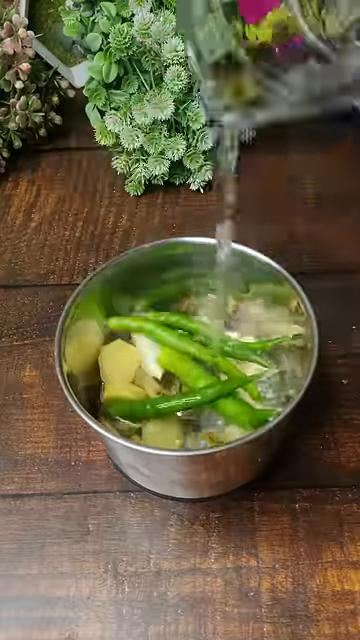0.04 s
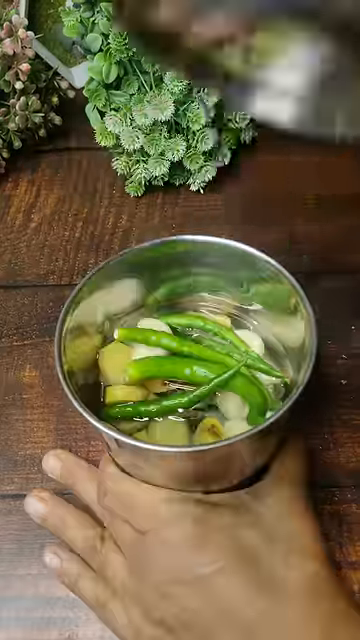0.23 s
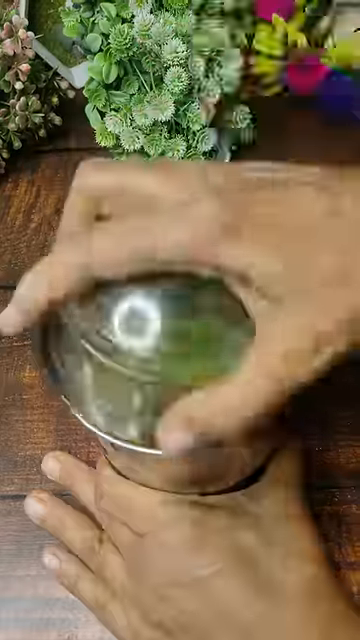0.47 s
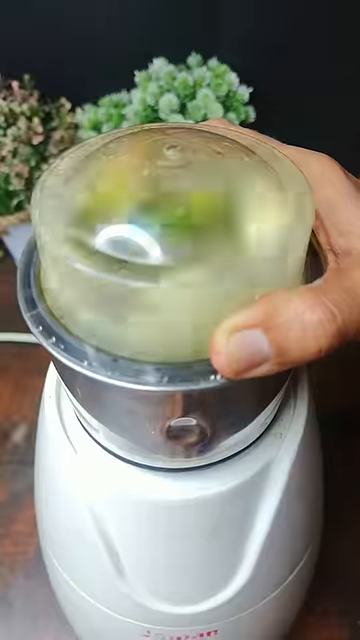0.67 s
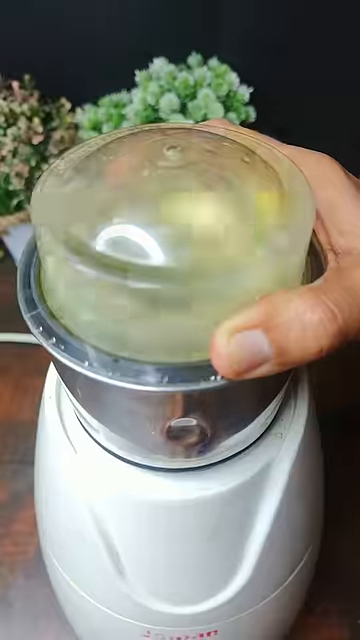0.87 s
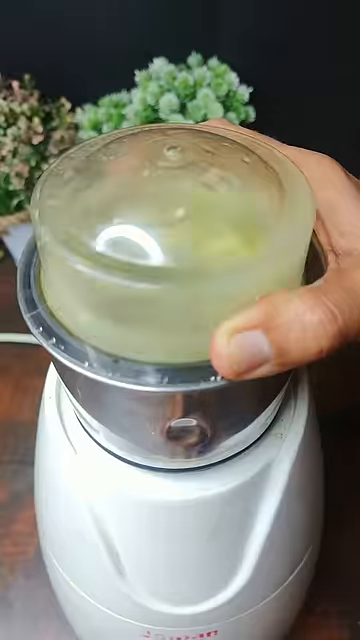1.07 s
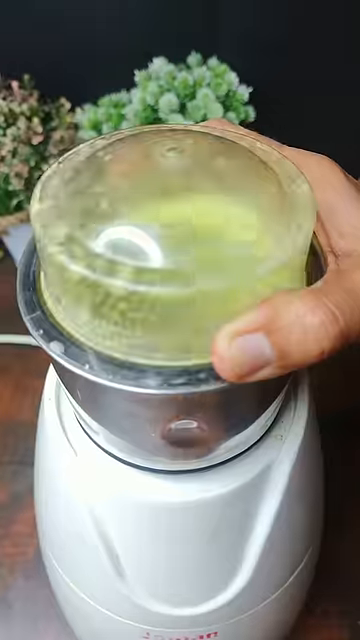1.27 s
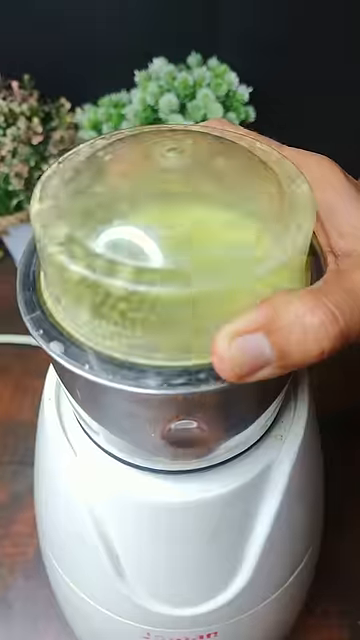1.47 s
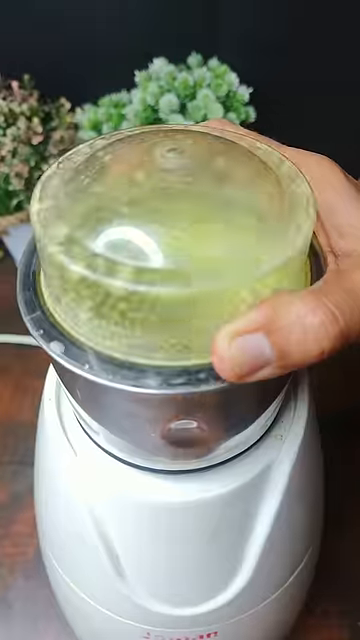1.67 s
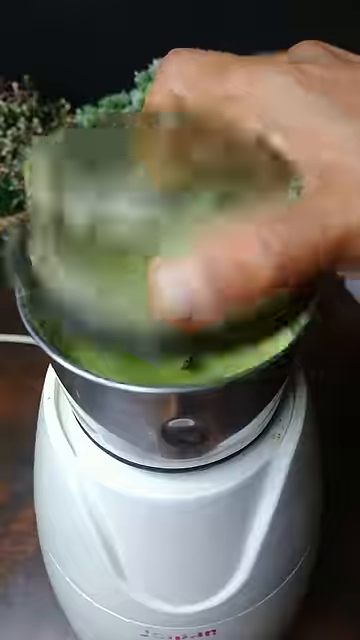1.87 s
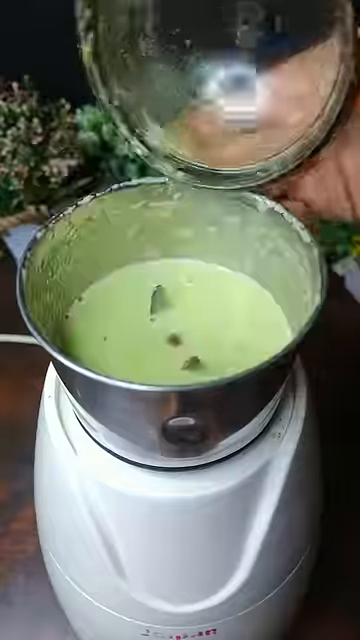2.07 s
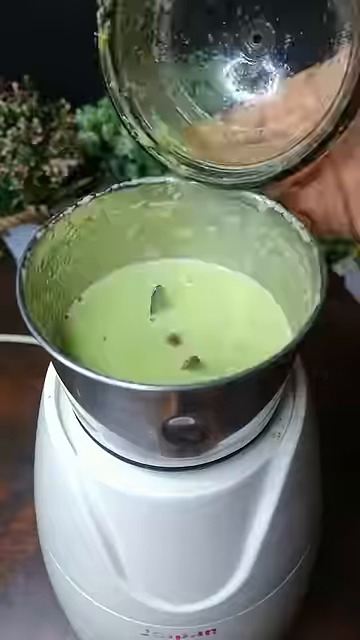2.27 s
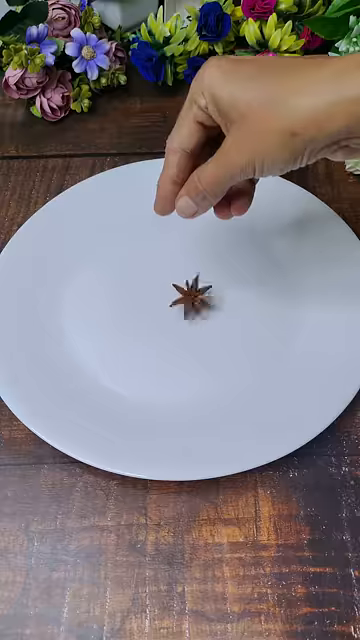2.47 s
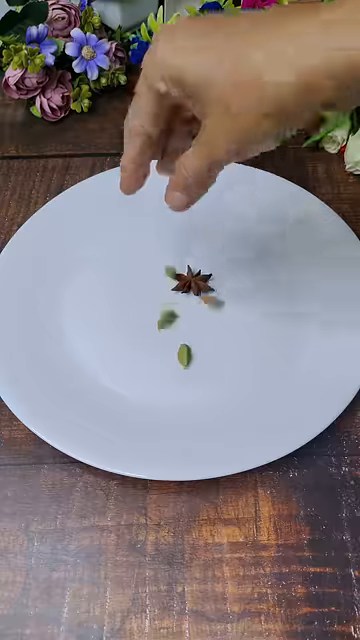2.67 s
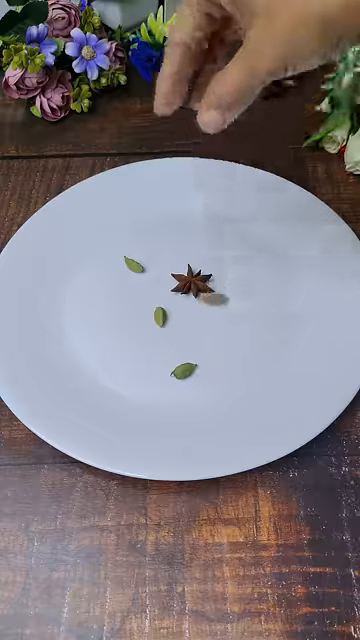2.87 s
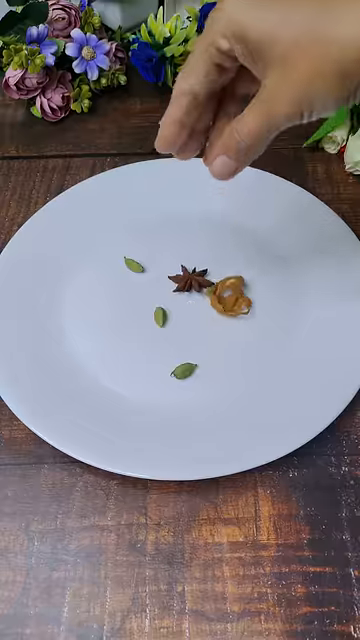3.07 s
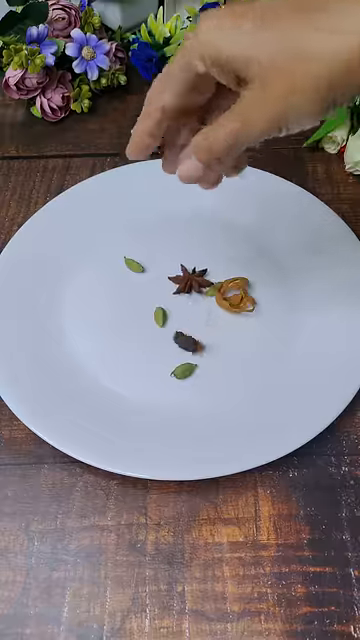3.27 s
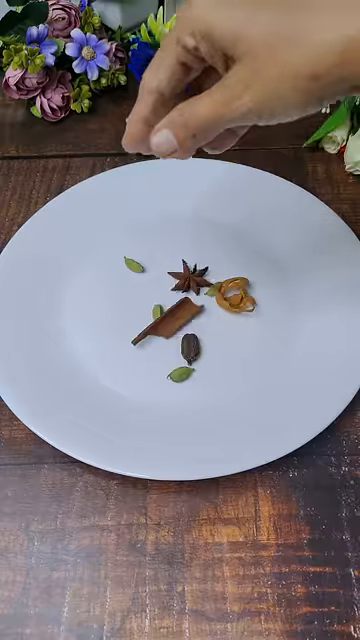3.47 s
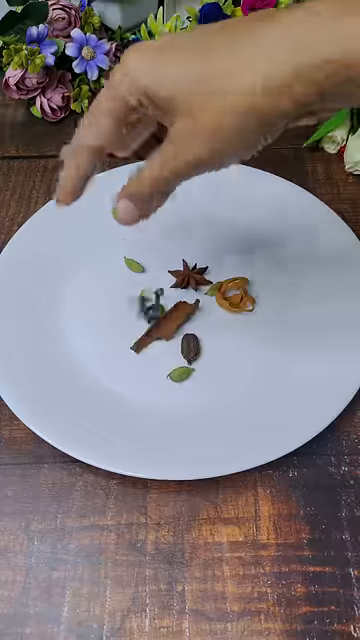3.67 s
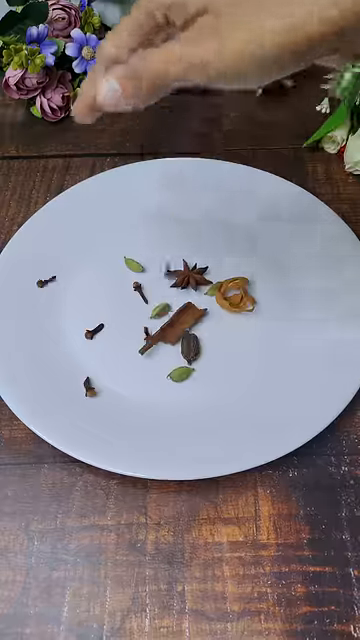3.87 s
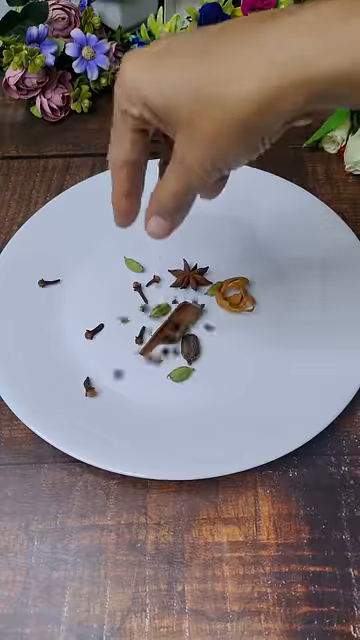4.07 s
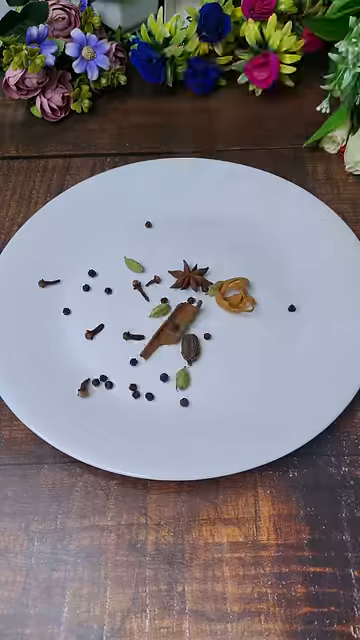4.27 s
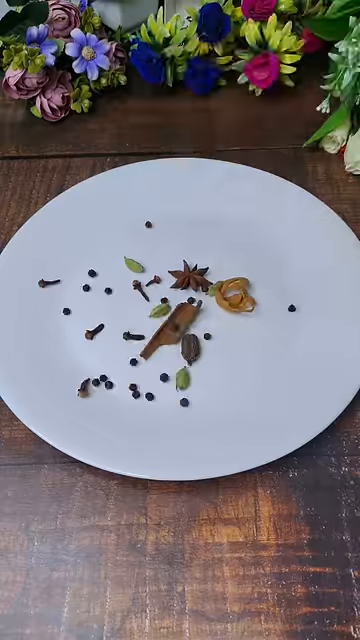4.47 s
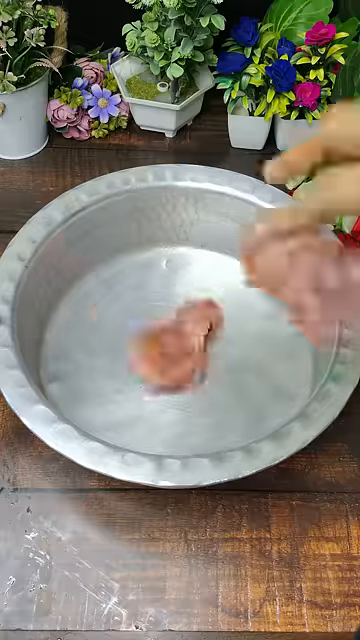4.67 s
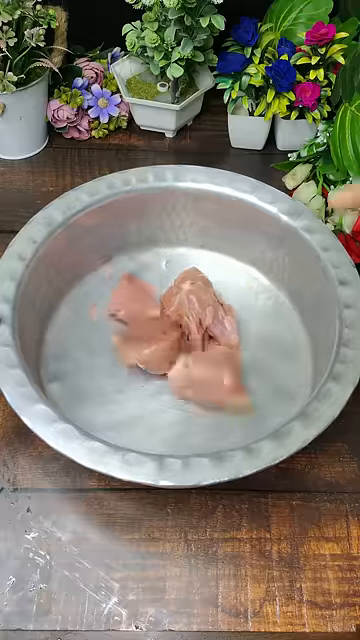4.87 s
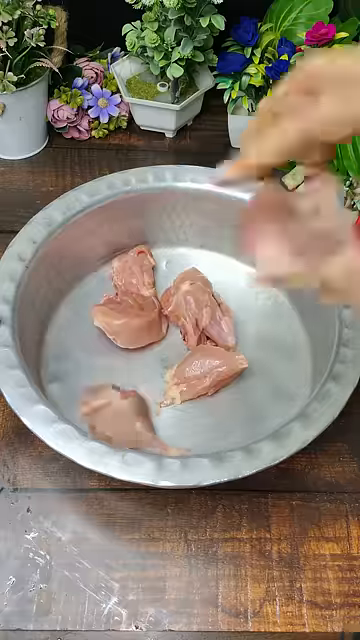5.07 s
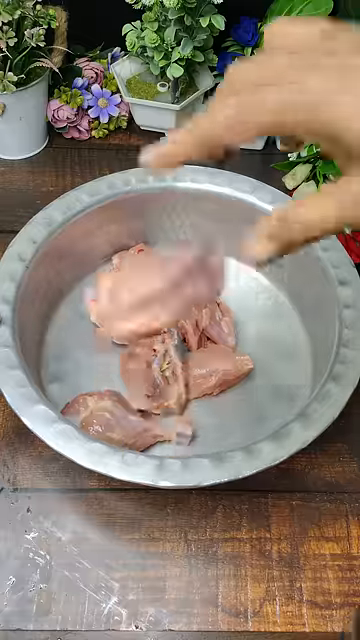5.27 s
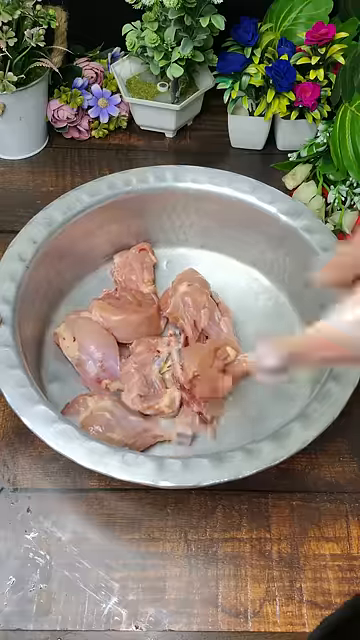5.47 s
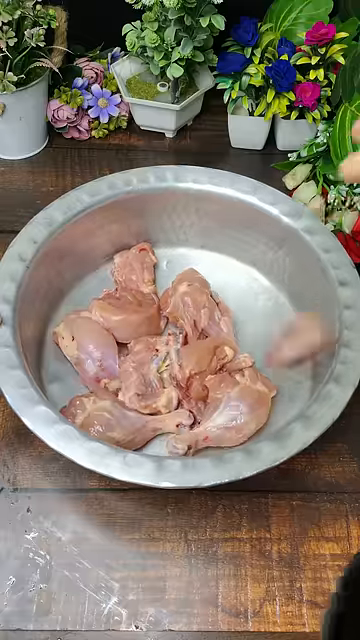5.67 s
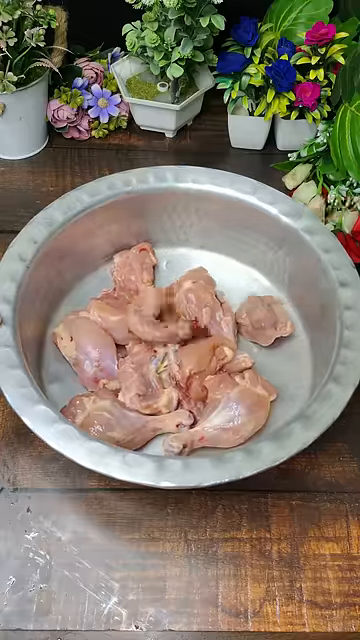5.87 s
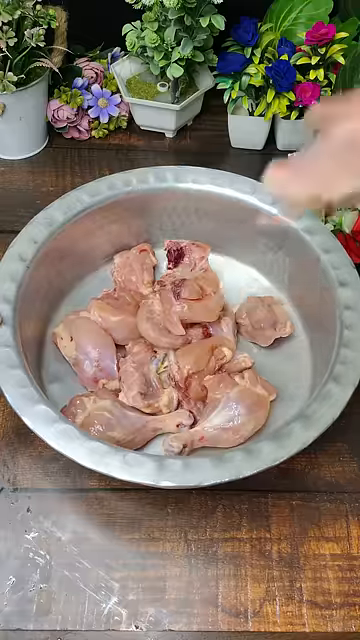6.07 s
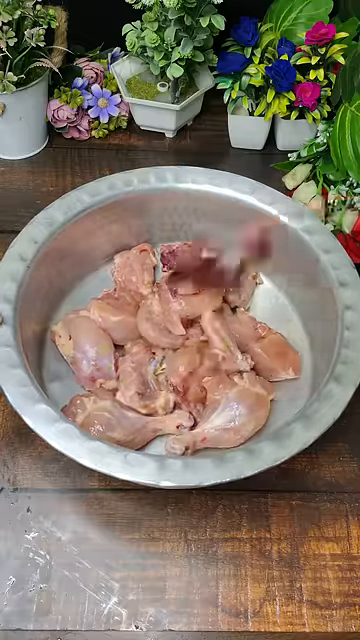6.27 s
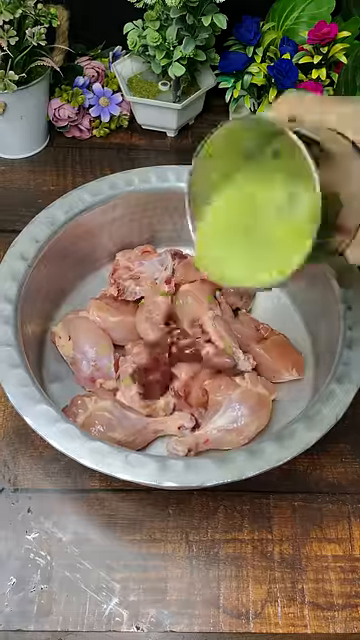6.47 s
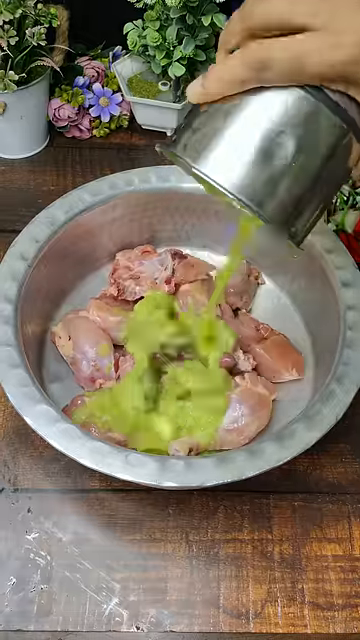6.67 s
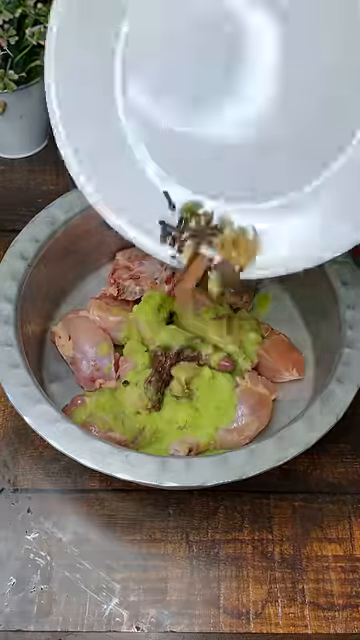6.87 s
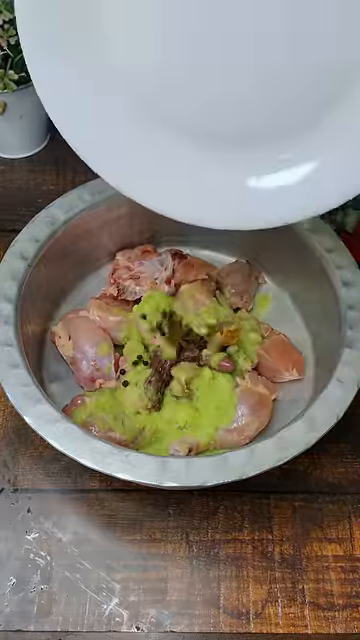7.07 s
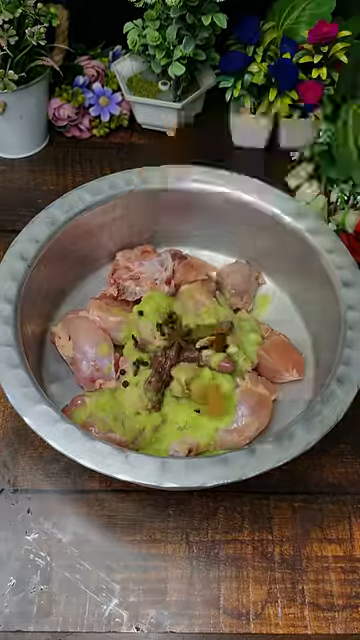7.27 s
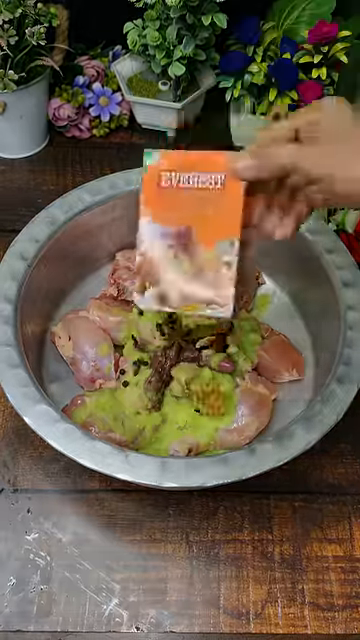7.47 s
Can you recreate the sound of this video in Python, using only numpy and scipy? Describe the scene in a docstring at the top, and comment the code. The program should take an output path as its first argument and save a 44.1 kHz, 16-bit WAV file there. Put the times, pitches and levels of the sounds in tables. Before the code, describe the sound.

A brisk cooking sequence close to the microphone in a small room, each sound clipped off with near silence between. Water splashes into a steel jar; its lid thumps on; a grinder hums, roars and slows. After wet lid noises come bright ticks of spices on china, heavier for bark, finer for peppercorns. Fleshy slaps hit a broad metal pot, then paste squelches and crackles, and seeds scrape and rain softly.

```python
"""A briskly cut kitchen sequence: water (chirping bubbles, hissing splash) runs into a steel jar, its lid goes on,
a grinder (tones and grainy noise) whirls and runs down, the lid comes off with wet smacks. Whole spices strike
the modes of a china plate, meat slaps and thuds into a wide metal pot on a wooden table, paste is poured over it
as wet bursts and crackle, and the spices slide off the plate by friction. Each passage is cut off while it
still rings, over a wash of noise; some landings of meat are heard again, once or twice."""
import sys
import numpy as np
from scipy import signal
from scipy.io import wavfile

SR = 44100
rng = np.random.default_rng(int(sys.argv[2]) if len(sys.argv) > 2 else 0)


def dump_mix(stems):
    """Bounce the given channels to the path in sys.argv[1] as a 16-bit WAV at rate SR."""
    frames = np.atleast_2d(stems).T  # one column per channel
    limited = np.clip(frames, -1, 1)  # hard clip at full scale
    pcm = np.round(limited * 32767).astype(np.int16)
    wavfile.write(sys.argv[1], SR, pcm)


N = 332073

# The passages of the sequence. Each row: opening in seconds, closing in seconds,
# level in dB of the wash of noise under the passage.
PASSAGES = [(0.0, 0.136, -55), (0.399, 0.547, -50.5), (0.576, 1.205, -56), (1.191, 1.877, -55.5),
            (1.882, 2.065, -48), (2.076, 2.459, -49.5), (2.516, 2.659, -56.5), (2.693, 2.914, -52.5),
            (2.965, 3.162, -49.5), (3.249, 3.396, -58.5), (3.458, 3.68, -53.5), (3.781, 4.021, -54),
            (4.101, 4.309, -61), (4.6, 4.677, -35.5), (4.721, 4.795, -38.5), (4.866, 4.936, -38),
            (4.986, 5.087, -43), (5.154, 5.226, -33.5), (5.531, 5.611, -41), (6.068, 6.171, -47.5),
            (6.217, 6.37, -57), (6.478, 6.85, -56), (6.843, 7.303, -67.5)]
# Modes of the steel jar. Each row: frequency in Hz, relative level in dB, decay time t60 in seconds.
JAR_MODES = [(132.8, -6, 0.18), (564, -3.5, 0.057), (279, 0, 0.097), (335, 7, 0.023), (747, 6, 0.06),
             (920, -0.5, 0.034), (1350, -6.5, 0.05)]
# Low modes of pot and table top. Each row: frequency in Hz, relative level in dB, decay time t60 in seconds.
THUD_MODES = [(109.4, -5, 0.39), (135.2, 1.5, 0.16), (260, -14.5, 0.15)]


def from_db(db):
    """Amplitude ratio by the definition of the decibel."""
    return 10 ** (np.asarray(db) / 20)


def rms_one(x):
    """Normalization to unit root-mean-square amplitude."""
    return x / np.sqrt(np.mean(x ** 2) + 1e-20)


def span(*tables):
    """Envelopes linear in dB: the sample range of some curve tables and their summed gains over it."""
    first, last = round(tables[0][0][0] * SR), round(tables[-1][-1][0] * SR)
    t = np.arange(first, last) / SR
    gains = 0
    for rows in tables:
        s, *columns = np.transpose(rows)
        # outside its own times a table is silent
        gains = gains + from_db([np.interp(t, s, c, left=-200, right=-200) for c in columns])
    return slice(first, last), gains


def at_hz(points, hz):
    """Interpolation along a logarithmic frequency axis."""
    points = np.array(points)
    return np.interp(np.log(hz), np.log(points[:, 0]), points[:, 1])


def band(x, low_hz, high_hz):
    """Band-pass filtering with Butterworth skirts."""
    sos = signal.butter(2, [low_hz, min(high_hz, .46 * SR)], "band", fs=SR, output="sos")
    return signal.sosfilt(sos, x)


def grains(count, per_s, spread_db):
    """Shot noise: random impulses of uneven size and sign, normalized to rms 1."""
    sizes = from_db(spread_db * np.minimum(rng.exponential(1, count), 4)) * rng.choice([-1, 1], count)
    return rms_one(sizes * (rng.random(count) < per_s / SR))


def coloured(count, spectrum, low_hz, high_hz, grain=0., per_s=540.0):
    """Band-by-band stereo noise of rms 1; shared clicks, a share grain of its power, line the bands up."""
    # Correlation of the two ears. Each row: frequency in Hz, left-right likeness from 0 to 1.
    likeness = [(60, 1), (240, 0.85), (950, 0.11), (3770, 0.05)]
    edges_hz = 22 * 2 ** np.arange(0, 9.9, .4)
    white = rng.standard_normal((2, 2, count))
    clicks = grains(count, per_s, 3.0)
    share = np.clip(grain, 0, 1)
    out = 0
    for k, (low, high) in enumerate(zip(edges_hz, edges_hz[1:])):
        hz = np.sqrt(low * high)
        if low_hz < hz < high_hz:
            click_pair = clicks * [[1], [1 - 2 * (k % 2)]]
            mid, side = band(np.sqrt(1 - share) * white[k % 2] + np.sqrt(share) * click_pair, low, high)
            alike = np.clip(at_hz(likeness, hz), 0, 1)
            stereo = np.sqrt(1 + alike) * mid + np.sqrt(1 - alike) * side * [[1], [-1]]
            out = out + from_db(at_hz(spectrum, hz)) * stereo
    return rms_one(out)


def by_passage(x, work):
    """Truncated response: every passage is worked on alone, so nothing rings on across a cut."""
    out = np.zeros((2, N))
    for opens, closes, *_ in PASSAGES:
        part = slice(round(opens * SR), round(closes * SR))
        if np.any(x[..., part]):
            out[:, part] = work(x[..., part])
    return out


def ring(clicks, hz, t60):
    """Impulse response of a damped resonator; the angle of a complex click sets the phase."""
    pole = from_db(-60 / (t60 * SR)) * np.exp(2j * np.pi * hz / SR)
    return signal.lfilter([1], [1, -pole], clicks).imag


def resound(drive, modes):
    """Modal superposition under a dense drive."""
    return by_passage(drive, lambda part: sum(from_db(db) * ring(part, hz, t60) for hz, db, t60 in modes))


def struck(modes, s, db, pan_db, scatter_db, wide_hz):
    """Modal excitation by blows (db: blows x modes); higher modes reach the ears ever less in phase."""
    out, luck = np.zeros((2, N)), rng.standard_normal((len(s), len(modes), 2))
    for opens, closes, *_ in PASSAGES:
        here, first = (s >= opens) & (s < closes), round(opens * SR)
        for k, (hz, level_db, t60) in enumerate(modes if here.any() else []):
            clicks = np.zeros((2, round(closes * SR) - first), complex)
            phase = np.outer([1, -1], luck[here, k, 1]) * min(hz / wide_hz, 1.2)
            turn = (-1) ** k * np.exp(1j * phase)
            pan = np.outer([.5, -.5], pan_db[here])
            size = from_db(db[here, k] + level_db + scatter_db * luck[here, k, 0] + pan)
            clicks[:, (s[here] * SR).astype(int) - first] = size * turn
            out[:, first:first + clicks.shape[1]] += ring(clicks, hz, t60)
    return out


def cracks(s, db, hz, pan_db, t60, octaves, alike=.15):
    """Decaying noise bursts around a centre: a contact, or a clatter of modes too dense to tell apart."""
    rise_s = 0.000079   # time constant of the onset
    out = np.zeros((2, N))
    ends = [closes for opens, closes, *_ in PASSAGES]
    for start, level_db, centre, pan in zip(s, db, hz, pan_db):
        left_s = ends[np.searchsorted(ends, start)] - start   # until the cut
        t = np.arange(round(min(t60, left_s) * SR)) / SR
        envelope = from_db(-60 * t / t60) * (1 - np.exp(-t / rise_s))
        mid, side = rng.standard_normal((2, round(t60 * SR)))[:, :len(t)] * envelope
        low, high = centre / 2 ** octaves, centre * 2 ** octaves
        burst = band(mid + (1 - alike) * side * [[1], [-1]], low, high)
        burst = band(burst, low / 2, high * 2.3)   # steeper skirts
        size = np.sqrt(t60 * SR / np.sum(burst ** 2)) / 8   # peak near 1
        at = round(start * SR)
        out[:, at:at + len(t)] += size * burst * from_db(level_db + np.array([[.5], [-.5]]) * pan)
    return out


def blobs(s, db, hz, cycles, climb):
    """Bubble resonance: air pockets closing in liquid give short rings whose pitch climbs."""
    out, t = np.zeros((2, N)), np.arange(900) / SR
    for start, level_db, pitch, pan in zip(s, db, hz, rng.uniform(-4, 3.5, len(s))):
        age = t * pitch / cycles
        chirp = np.sin(2 * np.pi * pitch * t * (1 + climb * t)) * age * np.exp(1 - age)
        at = round(start * SR)
        out[:, at:at + 900] += chirp * from_db([[level_db + pan], [level_db - pan]])
    return out


def water():
    """Bubble resonance: dense small air pockets ring on a fine noise of splashing."""
    # Level curve of the trickle. Each row: time in seconds, level in dB.
    trickle = [(0.0, -35.5), (0.134, -37.5)]
    # The clearest bubbles. Each row: start in seconds, level over the trickle in dB, pitch in Hz.
    clear_bubbles = [(.017, -5.5, 1280), (.044, 1, 3600), (.062, 1, 2350), (.076, 0, 3040), (.084, 3, 3160),
                     (.094, 4, 2000), (.117, 4, 3360)]
    part, (gain,) = span(trickle)
    when, pitch, size = rng.random((130, 3)).T
    small = blobs(when * part.stop / SR, 16 * size + 5 * pitch, 1050 * 5.5 ** pitch, cycles=2.3, climb=3.2)
    s, db, hz = np.transpose(clear_bubbles)
    drops = blobs(s, db, hz, cycles=4.0, climb=6.2)
    drops += cracks(s, db + 10, 8800 + 0 * s, 0 * s, t60=0.014, octaves=0.21)   # each drop spits
    bubbles = 0.29 * rms_one(small[:, part]) + drops[:, part]
    splash_colour = [(500, -12.5), (3000, -3.5), (6200, -12), (9000, -9.5), (15000, -18)]   # (Hz, dB per Hz)
    splash = coloured(part.stop, splash_colour, 500, 16000, grain=0.38)
    return np.pad(gain * (bubbles + 0.46 * splash), [(0, 0), (0, N - part.stop)])


def jar():
    """Modal excitation: knocks and lumps ring wall and base; hands rumble the table, the wet lid rustles."""
    # Lid pressed on, switch thrown, lid pulled off. Each row: start in seconds, then relative levels in dB
    # of ring, thump, crack and bright rasp.
    knocks = [(0.407, -26, -20.5, -18.5, -21), (0.419, -53.5, -8.5, -15.5, -37),
              (0.428, -37.5, -11.5, -34, -44), (0.656, -48.5, -40.5, -4.5, -10.5),
              (0.677, -25, -9.5, -11, -21), (0.699, -22.5, -7.5, -24.5, -21),
              (1.938, -29.5, -18, -21.5, -38)]
    # Lumps caught by the blade, the last ones as it slows. Each row: start in seconds, relative ring level
    # in dB, hardness as crack over ring in dB.
    flung = [(0.8111, -27.5, 19), (.826, -28, 18.5), (0.8476, -30.5, 19.5), (.949, -23.5, 19),
             (0.9875, -24, 24), (1.251, -26, 2.5), (1.301, -27.5, -6.5), (1.327, -28.5, 21),
             (1.342, -22.5, 13.5), (1.375, -27.5, -8), (1.4, -27, -13), (1.471, -28.5, -7), (1.512, -41, 2),
             (1.554, -31, 7), (1.673, -36.5, 2)]
    # Wet lid peeling free. Each row: start in seconds, relative peak in dB, centre frequency in Hz.
    smacks = [(1.943, -20.5, 6900), (2.088, -27, 5660), (2.1124, -17, 5650)]
    # Hands on the jar, one table per touch. Each row: time in seconds, rumble through the table in dB,
    # wet lid rustle in dB.
    hands = [
        [(0.571, -35, -95), (0.643, -55, -75), (0.66, -59, -37)],
        [(1.884, -39, -97), (1.936, -37, -40.5), (2.071, -29.5, -81)],
        [(2.072, -35, -48), (2.128, -36, -42.5), (2.457, -43, -106)],
    ]
    # Spectrum of the rustle. Each row: frequency in Hz, relative density in dB per Hz.
    rustle_colour = [(300, 0), (654, -9.5), (2680, -18), (14500, -23)]
    lump_thump_db = 2.5   # over the ring
    lumps = [(s, db, db + lump_thump_db, db + hard_db) for s, db, hard_db in flung]
    s, db, thump_db, crack_db = np.transpose([row[:4] for row in knocks] + lumps)
    out = struck(JAR_MODES, s, db[:, None] + np.zeros(len(JAR_MODES)), 0 * s, scatter_db=3.0, wide_hz=1500)
    out += cracks(s, thump_db, 350 + 0 * s, 0 * s, t60=0.18, octaves=0.8, alike=0.94)   # base
    out += cracks(s, crack_db, 2200 + 0 * s, 0 * s, t60=.03, octaves=0.9)
    # dull knock of the wall
    out += cracks(s, db + 6, 750 + 0 * s, 0 * s, t60=0.052, octaves=0.52, alike=0.6)
    s, *_, rasp_db = np.transpose(knocks)
    out += cracks(s, rasp_db, 9000 + 0 * s, 0 * s, t60=0.12, octaves=0.23)
    s, db, hz = np.transpose(smacks)
    out += cracks(s, db, hz, 0 * s, t60=0.038, octaves=0.37)
    part, (rumble, rustle) = span(*hands)
    count = part.stop - part.start
    rumble_colour = [(20, 3.5), (42, 0.5), (110, -2.5), (250, -30.5)]   # (Hz, dB per Hz)
    out[:, part] += rumble * coloured(count, rumble_colour, 20, 300)
    out[:, part] += rustle * coloured(count, rustle_colour, 300, 16000, grain=0.085)
    return out


def grinder():
    """Forced vibration: motor shake, churning paste and blade hiss; flung grains drive the jar's modes."""
    # Vigour of the paste, starting up, then running down. Each row: time in seconds,
    # level in dB with 0 at full speed.
    whirl = [
        [(.658, -29.5), (.676, -17.5), (.69, -6.5), (.76, -13), (.82, -1), (1.197, 0)],
        [(1.196, -13.5), (1.3, -17), (1.55, -27), (1.72, -39.5), (1.881, -63.5)],
    ]
    # The shaft's tone climbs as the load thins. Each row: time in seconds, frequency in Hz,
    # level relative to the shaking in dB.
    shaft = [(.9, 159.7, -15), (1.02, 178.8, -5), (1.197, 196.6, -6)]
    # Spectrum of shake, churn and hiss. Each row: frequency in Hz, relative density in dB per Hz.
    grind_colour = [(40, -26.5), (88, -4.5), (281, -9.5), (618, -15), (734, -4.5), (1200, -11),
                    (1460, -3.5), (3920, -15), (7640, -12.5), (14500, -35)]
    # A faint squeak as the blade slows. Each row: time in seconds, relative level in dB.
    squeaks = [
        [(1.83, -63), (1.876, -59)],
    ]
    shake_db, churn_db, hiss_db = -24.5, -15.5, -18   # at full speed
    shake_follows, churn_follows, hiss_follows = 0.36, 1, 0.87   # share of the vigour's swing in dB
    hum_hz, hum_db = 100.7, -3.5   # mains tone, level relative to the shaking
    chop_db, chop_hz = 1.5, 70   # uneven chopping: rms swing, top rate

    part, (vigour,) = span(*whirl)
    shake = from_db(shake_db) * vigour ** shake_follows
    churn = from_db(churn_db) * vigour ** churn_follows
    hiss = from_db(hiss_db) * vigour ** hiss_follows
    count, out = part.stop - part.start, np.zeros((2, N))
    flung_grains = np.zeros((2, N), complex)
    flung_grains[:, part] = grains(count, 210.0, 2.3) * churn

    t = np.arange(part.start, part.stop) / SR
    s, hz, db = np.transpose(shaft)
    turn = 2 * np.pi * np.cumsum(np.interp(t, s, hz)) / SR
    hum = from_db(hum_db) * np.sin(2 * np.pi * hum_hz * t)
    hum += from_db(np.interp(t, s, db)) * (np.sin(turn) + .5 * np.sin(2 * turn))
    hum *= t < whirl[0][-1][0]   # the tones stop where the run-down begins

    chop = from_db(chop_db * rms_one(band(rng.standard_normal((2, count)), chop_hz / 10, chop_hz)))
    churn, hiss = churn * chop[0], hiss * np.sqrt(chop[0] * chop[1])
    out[:, part] = shake * hum
    out[:, part] += shake * coloured(count, grind_colour, 40, 400, grain=0.3, per_s=86.0)
    out[:, part] += churn * coloured(count, grind_colour, 400, 3000, grain=0.4, per_s=200.0)
    out[:, part] += hiss * coloured(count, grind_colour, 3000, 16000, grain=0.045, per_s=180.0)

    part, (squeak,) = span(*squeaks)
    out[:, part] += ring(squeak * rng.standard_normal(len(squeak)) / 10, hz=1766, t60=0.12)
    return out + from_db(-34.5) * resound(flung_grains, JAR_MODES)


def plate():
    """Modal and friction excitation: light seeds wake high modes, heavy bark low ones; sliding rubs."""
    # Modes of the lying plate. Each row: frequency in Hz, relative level in dB, decay time t60 in seconds.
    plate_modes = [(1046, -4.5, 0.078), (1146, 0.5, 0.034), (1812, -4, 0.029), (1940, -4.5, 0.044),
                   (2963, -6, 0.058), (3725, -2.5, 0.049), (4496, -7.5, 0.082), (4612, -3.5, 0.07),
                   (4890, -11.5, 0.075), (5963, -4.5, 0.11), (7020, -16, 0.036), (7340, -14.5, 0.12),
                   (7910, -9.5, 0.093), (9370, 2, 0.059), (10170, -9, 0.083), (11210, -6.5, 0.065),
                   (12050, -10, .05), (13800, -14.5, 0.06)]
    # Modes of the plate in the hand. Each row: frequency in Hz, relative level in dB, t60 in seconds.
    held_modes = [(960, -11.5, 0.12), (1705, -13, 0.064), (2730, -10.5, 0.1), (3790, -10.5, 0.091),
                  (4870, -8.5, 0.061)]
    # Spices dropped, by name. Each row: relative levels in dB of the ring, the low ring, the ring near 6 kHz
    # and near 4.6 kHz, then landing and bounces, each with start in seconds, relative peak and treble in dB.
    spices = { "star anise": (-11, -1.2, -11, 5.9, [(2.54, -18.5, -17.5), (2.55, -10, -12),
              (2.561, -34.5, -15), (2.617, -30, -27)]),
              "green cardamom": (-21, 0.9, 0.1, 0, [(2.694, -18, -8), (2.702, -10.5, 3.5),
              (2.774, -18.5, -6.5), (2.83, -23.5, -4.5)]), "mace": (-22, 0.99, 2.6, -6, [(2.975, -13, 5),
              (2.986, -15.5, -28), (3.086, -21, 1), (3.1, -18, -1), (3.138, -24.5, 1)]),
              "black cardamom": (-20.5, 0, 6, 1.9, [(3.26, -9, -8.5), (3.27, -16, -18),
              (3.346, -14.5, -25.5), (3.39, -15.5, -19)]),
              "cinnamon bark": (-19.5, 4.9, -16, 0, [(3.466, -9, -6.5), (3.492, -5.5, -4),
              (3.511, -18, -0.5), (3.587, -18.5, -25)]),
              "cloves": (-20.5, -4.5, -1.4, 0, [(3.79, -11, -13.5), (3.804, -7, -2), (3.884, -16, 0),
              (3.935, -15, 3.5), (3.995, -25.5, -6)]), "peppercorns": (-17, -10.5, -2, 0, [(4.104, -36, 8),
              (4.125, -28.5, 8.5), (4.155, -17.5, -5), (4.173, -14.5, 4.5), (4.205, -17.5, 3.5),
              (4.27, -23, 4), (4.286, -18.5, 2)]), }
    # Spices scraping along the plate. Each row: time in seconds, relative level in dB.
    slide = [(6.85, -42.5), (6.92, -47), (7.03, -39.5), (7.08, -45), (7.3, -60)]
    # softer touches give more of their sound to the low modes
    soft_low_db_per_db, firm_db = 0.5658, -11.5
    touches = []
    for ring_db, low_db, six_db, four_db, landings in spices.values():
        for s, db, high_db in landings:
            soft_low_db = low_db + soft_low_db_per_db * (firm_db - db)
            touches.append((s, db, ring_db, soft_low_db, six_db, four_db, high_db))
    s, db, *levels = np.transpose(touches)

    later, weaker = rng.random((len(s), 2, 2)).transpose(2, 1, 0)   # two small skips follow every landing
    s = np.concatenate([s, (s + .004 + .03 * later).ravel()])
    db = np.concatenate([db, (db - 8.5 - 9 * weaker).ravel()])
    ring_db, low_db, six_db, four_db, high_db = np.tile(levels, 3)
    pan = rng.normal(-1.2, 2.5, len(s))   # they land all over the plate

    # modes come in close clusters
    twins = plate_modes + [(split * hz, level_db - 3, 0.6 * t60)
                           for hz, level_db, t60 in plate_modes for split in (.987, 1.016)]
    hz = np.array(twins)[:, 0]
    tilt = np.outer(low_db, hz < 2300)
    tilt += np.outer(six_db, np.abs(hz - 6000) < 500)
    tilt += np.outer(four_db, np.abs(hz - 4600) < 200)
    tilt += np.outer(high_db, np.clip(np.log2(hz / 4600), 0, 1))   # treble of each touch
    # every spot has its own mix of modes
    out = struck(twins, s, (db + ring_db)[:, None] + tilt, pan, scatter_db=4.5, wide_hz=1500)
    centre = 3500 * from_db(0.22 * (high_db - low_db)).clip(.5, 2)
    out += cracks(s, db + 3.5, centre, pan, t60=0.0091, octaves=1.03)
    # rocking seeds damp the modes into broad bands
    clatter = cracks(s, db - 32.5, centre, pan, t60=0.13, octaves=1.35)
    out += resound(clatter, [(hz, level_db, 0.22 * t60) for hz, level_db, t60 in plate_modes])

    part, (gain,) = span(slide)
    phases = np.exp(2j * np.pi * rng.random((2, len(gain))))
    rub = gain * phases * grains(len(gain), 2200.0, 1.2)
    shifts = rng.normal(-2, 5., (len(held_modes), 20))   # the rubbing wanders, so each mode comes and goes
    for (hz, level_db, t60), shift_db in zip(held_modes, shifts):
        steps = np.linspace(0, len(shift_db), len(gain))
        wander_db = np.interp(steps, range(len(shift_db)), shift_db)
        out[:, part] += ring(rub * from_db(level_db - 29.5 + wander_db), hz, t60)
    out[:, part] += .6 * band(rub.real, 3400, 10600)
    return out


def pot():
    """Inelastic impact: a wet slap of two air pockets, damped metal ringing and a slowly swelling thud."""
    # Modes of the pot's metal. Each row: frequency in Hz, relative level in dB, decay time t60 in seconds.
    pot_modes = [(943, -11, 0.054), (1019, -3.5, 0.092), (1087, -3, 0.11), (1333, -1, 0.055),
                 (1780, -12.5, 0.07)]
    # Meat landing. Each row: start in seconds, relative slap level in dB, relative thud level in dB,
    # slap frequency in Hz, second slap frequency in Hz, sizzle relative to the slap in dB.
    meat = [(4.612, -3.5, -5.5, 1480, 2620, -5.5), (4.718, -24, -44, 1500, 4400, 8),
            (4.733, -7.5, -4.5, 1630, 3640, -3), (4.875, -8, -36, 1210, 1660, -14.5),
            (4.883, -5.5, -5.5, 1040, 2480, -8.5), (4.994, -8.5, -8.5, 1280, 2550, -3.5),
            (5.159, -11, -30, 1040, 2450, -5), (5.175, -3.5, -5, 1190, 2340, -22),
            (5.541, -9.5, -42, 2630, 1500, -4.5), (6.094, -9, -61, 2668, 1430, -5)]
    weight_rings = 0.12   # light scraps that hardly thud ring the pot less (dB per dB)
    s, db, thud_db, hz, second_hz, sizzle_db = np.transpose(meat)
    pan = -1.5 + 0 * s
    ring_db = (db - 16 + weight_rings * (thud_db - db))[:, None] + np.zeros(len(pot_modes))
    out = struck(pot_modes, s, ring_db, pan, scatter_db=3., wide_hz=1500)
    out += cracks(s, db + 2.0, hz, pan, t60=0.014, octaves=0.23, alike=0.51)
    out += cracks(s, db - 2.0, second_hz, pan, t60=0.012, octaves=0.14, alike=0.32)
    out += cracks(s, db - 9.0, np.sqrt(hz * second_hz), pan, t60=0.096, octaves=0.7)   # clatter of the wide wall
    # wobbling flesh
    out += cracks(s, thud_db - 18.5, 430 + 0 * s, pan, t60=0.09, octaves=0.2, alike=0.82)
    out += cracks(s, db + sizzle_db, 7000 + 0 * s, pan, t60=0.044, octaves=0.71)
    low_db = thud_db[:, None] + np.zeros(len(THUD_MODES))
    thud = struck(THUD_MODES, s, low_db, pan, scatter_db=1.0, wide_hz=1500)
    soft = np.exp(-2 * np.pi * 60 / SR)   # flesh spreads the push over some ms
    return out + signal.lfilter([(1 - soft) ** 2], [1, -2 * soft, soft ** 2], thud)


def pouring():
    """Bubble resonance and random impact: paste weighs on the pot and crackles; blobs and seeds land."""
    # Wet splats of liver and paste, then spices pattering down. Each row: start in seconds,
    # relative peak in dB, centre frequency in Hz.
    splats = [(6.3008, -13.5, 6570), (6.5, -26, 3800), (6.555, -37, 1820), (6.574, -18.5, 2230),
              (6.591, -32, 1080), (6.6036, -30.5, 1120), (6.615, -31, 2300), (6.6453, -27.5, 1450),
              (6.657, -23, 2580), (6.6775, -18.5, 2660), (6.693, -38, 2030), (6.75, -37, 2860),
              (6.7709, -28.5, 5000), (6.814, -33, 3160), (7.099, -22, 5640), (7.1387, -17.5, 4570),
              (7.1661, -23, 3580), (7.1912, -22, 8930)]
    # Pouring, one table per pour. Each row: time in seconds, relative weight on the pot in dB,
    # wet crackle in dB.
    pours = [
        [(6.218, -61, -87), (6.272, -67, -64), (6.298, -70, -37), (6.326, -66, -55), (6.37, -66, -65)],
        [(6.477, -48, -48), (6.6, -51.5, -46.5), (6.69, -48, -47), (6.85, -69, -52)],
    ]
    # Spectrum of the crackle. Each row: frequency in Hz, relative density in dB per Hz.
    pour_colour = [(650, -11), (1030, -0.5), (2700, -10.5), (10000, -2.5), (16000, -19)]
    # Spectrum of the patter. Each row: frequency in Hz, relative density in dB per Hz.
    patter_colour = [(773, -17), (4600, 2), (9360, -2), (16000, -8)]
    patter_s, patter_db, patter_fall_db_per_s = 7.085, -35.5, 106   # seeds rain on the meat and fade
    s, db, hz = np.transpose(splats)
    out = cracks(s, db + 2, hz, 0 * s, t60=.012, octaves=1.1)
    out += cracks(s, db - 4, hz, 0 * s, t60=0.05, octaves=0.91)   # each splat spreads and spits
    blob_db = db - 3 - 6. * np.log2(hz / 1500).clip(0, 4)
    out += blobs(s, blob_db, hz, cycles=2.2, climb=25.)

    wet = s < pours[1][-1][0]
    later, weaker, shift = rng.random((len(s), 3, 3))[wet].T   # three gurgles trail every wet splat
    gurgle_s, gurgle_db = s[wet] + later / 25, db[wet] - 10 - 10 * weaker
    out += blobs(gurgle_s.ravel(), gurgle_db.ravel(), (1000 * 3 ** shift).ravel(), cycles=2.2, climb=25.)

    part, (weight, crackle) = span(*pours)
    push = np.zeros((2, N), complex)
    push[:, part] = weight * rng.standard_normal(len(weight))
    out += from_db(-22.5) * resound(push, THUD_MODES)
    out[:, part] += crackle * coloured(len(weight), pour_colour, 300, 18000, grain=0.36, per_s=270.0)

    end_s = PASSAGES[-1][1]
    end_db = patter_db - patter_fall_db_per_s * (end_s - patter_s)
    part, (patter,) = span([(patter_s, patter_db), (end_s, end_db)])
    out[:, part] += patter * coloured(len(patter), patter_colour, 500, 18000, grain=0.7, per_s=250.0)
    return out


def room(x):
    """Diffuse reverberation: convolution with dying noise, other in each ear, the treble gone sooner."""
    low_t60_s, treble_t60_s = 0.31, 0.28
    t = np.arange(SR // 2) / SR
    low, high = rng.standard_normal((2, 2, len(t)))
    tail = band(low, 100, 3700) * from_db(-60 * t / low_t60_s)
    tail += band(high, 2000, 18000) * from_db(-60 * t / treble_t60_s)
    tail *= np.clip(t / 0.009 - .5, 0, 1)   # the first walls answer after a few ms
    tail = tail / np.sqrt(np.sum(tail ** 2, axis=1, keepdims=True))
    return by_passage(x, lambda part: signal.fftconvolve(part[None], tail, axes=1)[:, :len(part)])


def scene():
    """Superposition: sources faded at each cut over a stepping wash of noise; some landings come again."""
    # Spectrum of the wash of noise. Each row: frequency in Hz, relative density in dB per Hz.
    wash_colour = [(25, -8), (249, -4.5), (695, -14), (2250, -19.5), (5280, -28), (11000, -31.5),
                   (16000, -55.5)]
    # Wash of noise between passages. Each row: time in seconds, level in dB.
    gap_wash = [(0.3, -70.5), (2.0, -65.5), (3.7, -62), (4.4, -69), (4.7, -64)]
    # Landings of meat heard again, once or twice. Each row: start in seconds, end in seconds,
    # delay in seconds.
    repeats = [(4.71, 4.80, 0.5497), (4.98, 5.09, 0.406), (4.86, 5.23, .8157)]
    fade_s, gaps_muted_s, room_db = 0.0042, 6.17, -8   # the gaps are silent from gaps_muted_s on
    # plate, pot and paste sound without deep bass; pot and paste also with a softened top
    kitchen = jar() + band(plate(), 92.7, 25600) + band(pot() + pouring(), 92, 12200)
    close = kitchen + from_db(room_db) * room(kitchen[0]) + water()
    close += band(grinder(), 77, 19000) * from_db([[-.5], [.5]])
    opens, closes, inside_db = np.transpose(PASSAGES)
    t = np.arange(N) / SR
    index = np.searchsorted(opens, t, side="right") - 1
    # the first passage starts without a fade
    edge_s = np.minimum(closes[index] - t, t - opens[index] + (index == 0))
    fader = np.clip(edge_s / fade_s, 0, 1)
    wash = band(coloured(N, wash_colour, 40, 18000), 61, 19000)
    # the third row carries the fader, so that repeats bring their own fades
    passages = np.vstack([(close + from_db(inside_db[index]) * wash) * fader, fader])
    for start, end, later in repeats:
        part = np.arange(round(start * SR), round(end * SR))
        passages[:, part + round(later * SR)] = passages[:, part]
    gaps = from_db(np.interp(t, *np.transpose(gap_wash))) * (t < gaps_muted_s)
    return passages[:2] + gaps * (1 - passages[2]) * wash


def record(dry):
    """Saturation and low-pass filtering: peaks are rounded, the top is cut, lower from lid on to lid off."""
    cutoff_hz, grinder_cutoff_hz = 16500, 14600
    rounded = .93 * np.tanh(dry / .93)
    out = signal.sosfilt(signal.cheby2(12, 60, cutoff_hz, fs=SR, output="sos"), rounded)
    jar_part = slice(round(PASSAGES[1][0] * SR), round(PASSAGES[5][1] * SR))
    low_pass = signal.cheby2(14, 50, grinder_cutoff_hz, fs=SR, output="sos")
    out[:, jar_part] = signal.sosfilt(low_pass, out[:, jar_part])
    return out


dry = scene()
out = record(dry)
dump_mix(out)
```